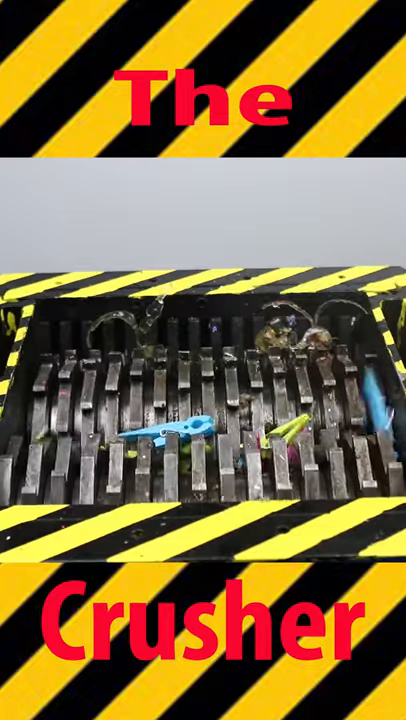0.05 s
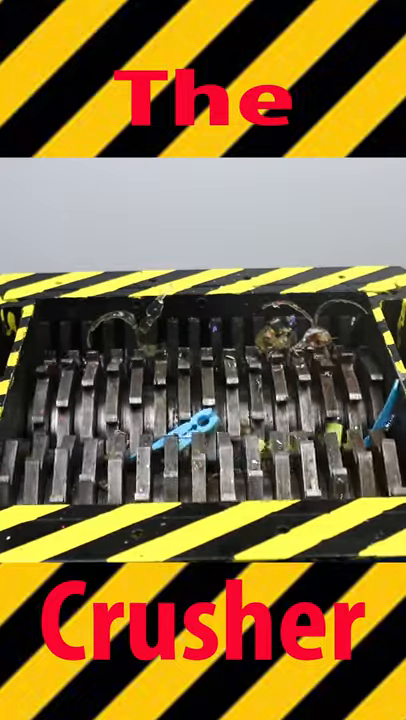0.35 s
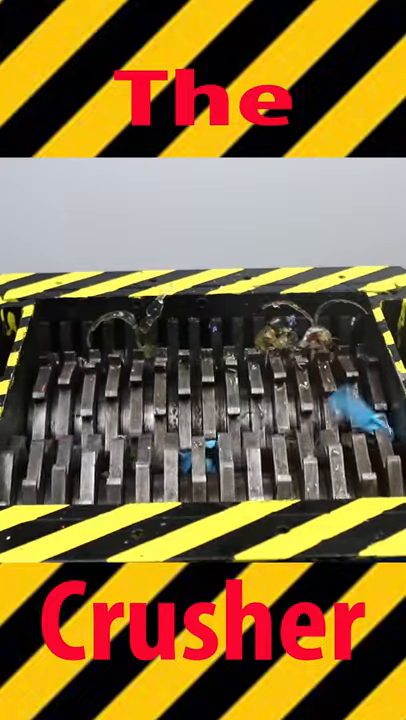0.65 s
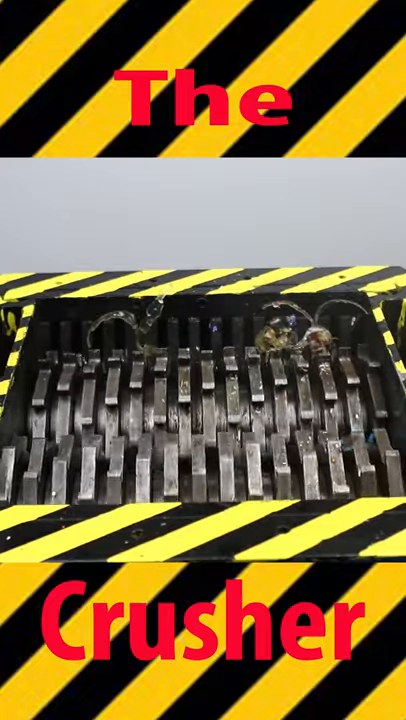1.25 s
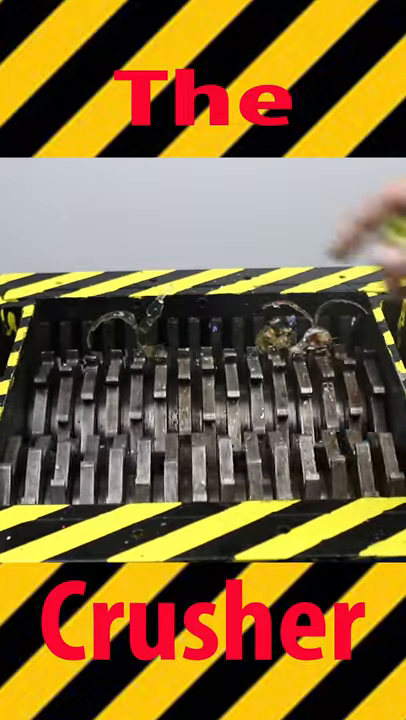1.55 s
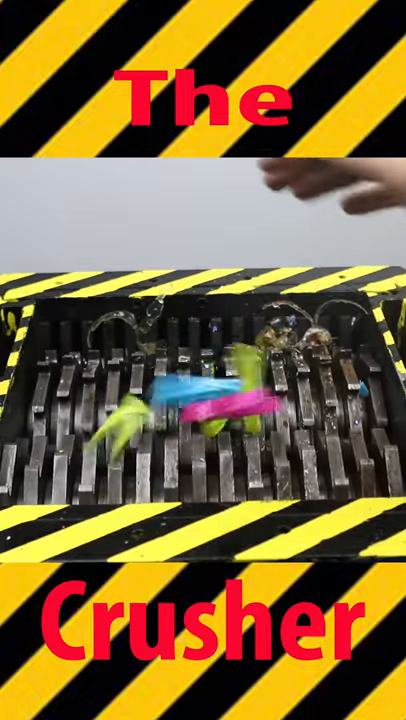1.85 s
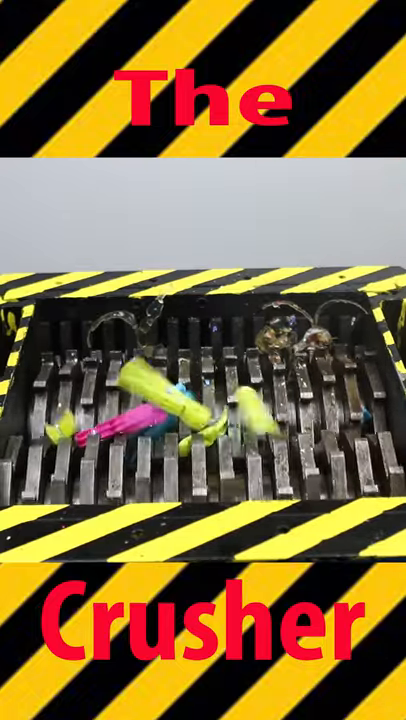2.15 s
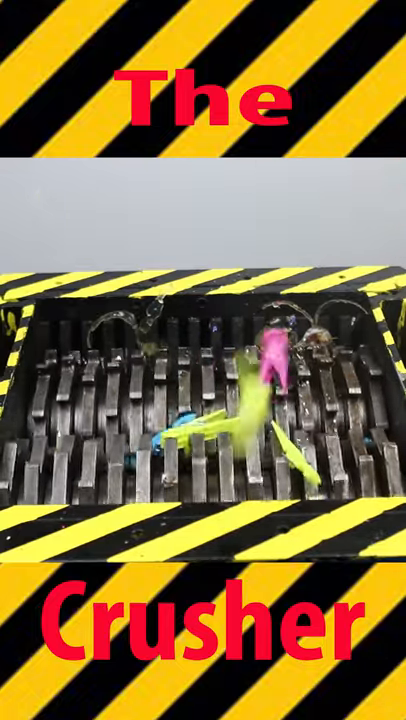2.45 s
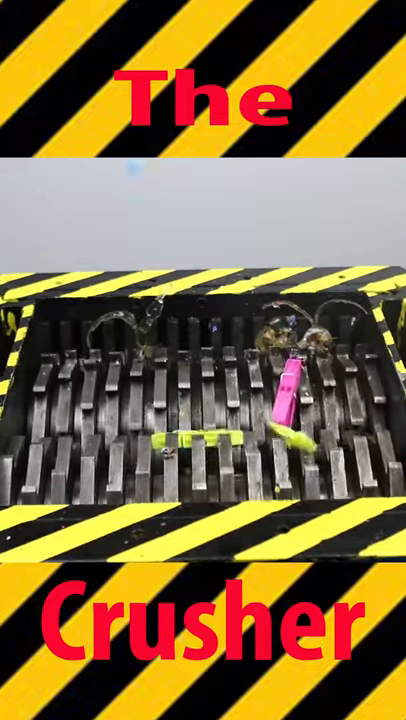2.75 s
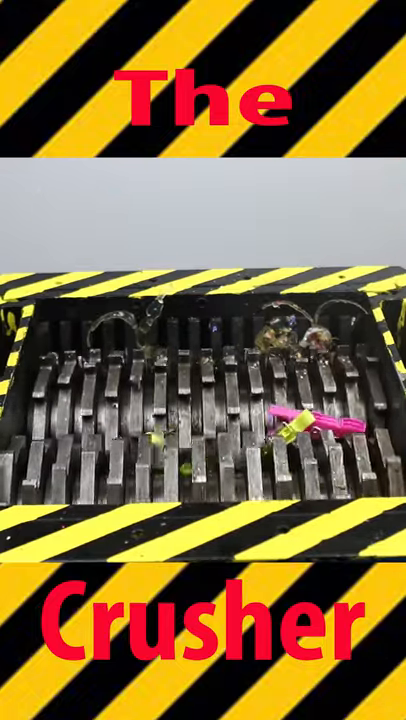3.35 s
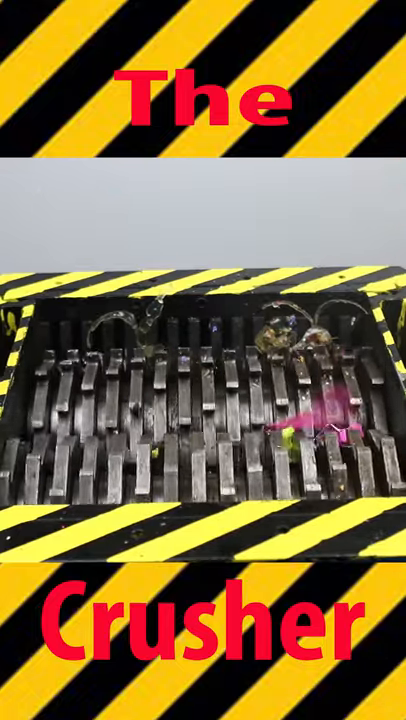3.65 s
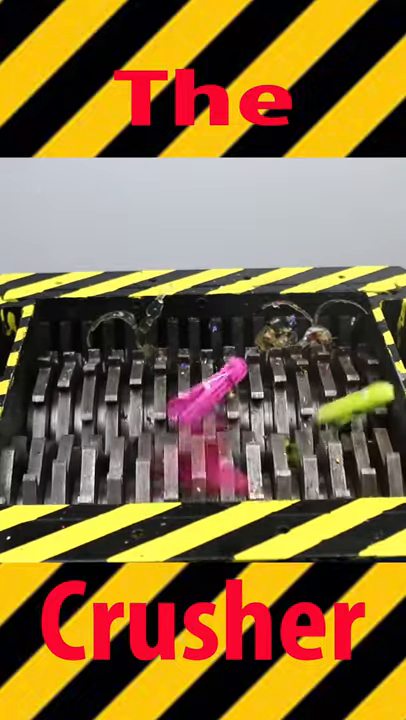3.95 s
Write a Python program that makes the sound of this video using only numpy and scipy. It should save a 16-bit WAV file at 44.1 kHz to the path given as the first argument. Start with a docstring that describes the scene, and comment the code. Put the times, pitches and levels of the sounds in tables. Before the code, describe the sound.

Plastic clothespins crack and snap in a running shredder over a low machine hum.

```python
"""Shredding plastic clothespins

Plastic pegs drop into a slow twin-shaft shredder, heard from close by. The cutters snap them with
bright cracks, crumbs patter about the steel hopper (the feed funnel), and a few pieces knock below.
Underneath, the gearbox hums and throbs with each turn of the motor."""
import sys
import numpy as np
from scipy import signal
from scipy.fft import rfft, irfft
from scipy.io import wavfile
from scipy.ndimage import uniform_filter1d

SR = 44100
rng = np.random.default_rng(int(sys.argv[2]) if len(sys.argv) > 2 else 0)


def waveform_to_disk(signal):
    """Save audio, clipped to [-1, 1], as 16-bit WAV at the path in sys.argv[1]."""
    frames = np.transpose(np.atleast_2d(signal))
    scaled = np.clip(frames, -1, 1) * 32767
    samples = np.round(scaled).astype(np.int16)
    wavfile.write(sys.argv[1], SR, samples)


N = 176400  # 4 seconds
TIME = np.arange(N) / SR
CLICK_TIME = np.arange(1024) / SR  # the seconds within one click
TOP_HZ = 16500  # upper edge of the treble


# pegs breaking (time [s], level [dB], ring pitch [Hz], relative level of the hollow body [dB])
SNAPS = [(0.0363, -21.5, 9900, -35.5), (0.059, -23, 10400, -41.5), (0.0917, -17, 9100, -25),
         (0.1343, -21.5, 9400, -27), (0.1463, -24, 11800, -39), (0.1656, -19, 15000, -36),
         (0.1694, -23, 10300, -32.5), (0.19, -24.5, 9700, -41), (0.2084, -16.5, 7500, -31.5),
         (0.229, -21.5, 9800, -35), (0.2745, -20, 12100, -36.5), (0.2958, -21.5, 9800, -35),
         (0.3114, -19.5, 10400, -37.5), (0.3237, -18.5, 13000, -40), (0.3471, -26, 13400, -42),
         (0.352, -24.5, 10900, -31.5), (0.4053, -20, 13100, -33), (0.4508, -27, 11200, -37.5),
         (0.4972, -10.5, 13000, -31), (0.5023, -14, 9200, -27), (0.5602, -14, 11200, -31.5),
         (0.6385, -18, 10800, -44), (0.685, -22.5, 13200, -36.5), (0.727, -26, 12600, -36),
         (0.764, -27, 14000, -33.5), (0.7675, -22, 12500, -26.5), (0.864, -28.5, 8460, -35.5),
         (0.891, -25.5, 12800, -30.5), (1.067, -26, 13900, -36), (1.1114, -15, 14600, -34.5),
         (1.117, -22, 8900, -37), (1.125, -16.5, 8840, -29), (1.2116, -24, 14600, -38.5),
         (1.2344, -12.5, 14200, -33), (1.2526, -23, 11100, -38.5), (1.2826, -22.5, 13100, -32.5),
         (1.4078, -22, 10900, -37), (1.424, -18, 13200, -26), (1.5109, -24, 14600, -41.5),
         (1.7932, -33.5, 15000, -38), (1.8649, -23, 10600, -32.5), (1.8701, -23.5, 13700, -31),
         (1.903, -28.5, 8300, -57), (1.9159, -23, 8700, -36), (2.171, -19.5, 11100, -40),
         (2.1881, -12, 11500, -23), (2.2555, -13, 9050, -31), (2.2911, -13.5, 10800, -37),
         (2.3102, -20, 12300, -30), (2.3538, -22, 13500, -38), (2.3938, -19, 12000, -24),
         (2.4324, -16, 11200, -31.5), (2.53, -18.5, 9400, -39), (2.5347, -17, 12500, -37.5),
         (2.6063, -21.5, 11500, -38.5), (2.6271, -18, 7400, -34), (2.6633, -23.5, 9700, -35),
         (2.725, -22.5, 9200, -33.5), (2.7612, -25.5, 9000, -31.5), (2.8033, -18, 16000, -39),
         (2.8423, -33.5, 8900, -33.5), (2.8784, -20.5, 12600, -35), (2.9104, -24, 8500, -27.5),
         (2.9225, -22, 12900, -34), (2.9332, -23.5, 13600, -38), (2.952, -18, 11200, -33.5),
         (2.9557, -25, 11400, -35), (2.9679, -22, 9900, -40), (3.0283, -25, 14400, -33.5),
         (3.0547, -25, 13600, -37.5), (3.1583, -21.5, 13600, -33), (3.1831, -23, 12900, -38),
         (3.2508, -20.5, 12200, -34.5), (3.4415, -17, 7770, -24.5), (3.4492, -20, 11500, -26),
         (3.478, -18, 12700, -44), (3.49, -17, 10800, -36.5), (3.592, -25.5, 11900, -34.5),
         (3.6202, -30.5, 12600, -43), (3.656, -23.5, 10500, -45), (3.663, -29, 10700, -33.5),
         (3.7488, -21, 13400, -35), (3.8183, -26.5, 12500, -35.5), (3.881, -20.5, 8860, -31),
         (3.9358, -27.5, 14200, -37)]
# the bright tone of cracking plastic (frequency [Hz], relative level [dB])
SNAP_COLOUR = [(100, -18.5), (1500, -19.5), (4500, -25), (6500, -7), (8600, 0), (10500, -1), (12000, -6.5),
               (14000, 3), (16000, -4)]
# the duller tone of the hollow body (frequency [Hz], relative level [dB])
BODY_COLOUR = [(40, -20), (200, -15.5), (1400, -11), (2900, 4), (4000, -2.5), (5200, 1), (16000, -30)]

def snaps():
    """A faint hiss swells into each crack; the hollow body sounds, and two tiny splinters follow."""
    out, bright, hollow = np.zeros(N), colour(SNAP_COLOUR), colour(BODY_COLOUR)
    for s, db, hz, body_db in SNAPS:
        add(out, s, amp(db) * crack(hz, bright))
        add(out, s, amp(body_db - 2) * puff(hollow, decay_s=.0021))
        lead_in = puff(bright, decay_s=.001)[::-1]  # backwards, so it swells into the crack
        add(out, s - CLICK_TIME[-1], amp(db - 22) * lead_in)
        for delay in np.cumsum(rng.exponential(.0022, size=2)):
            add(out, s + delay, amp(db - 18) * rng.random() * puff(bright, CRACK_S / 2))
    return out


CRACK_S, RING_S = .00065, .0038  # how quickly a crack and its ring die away

def crack(hz, bright):
    """Brittle plastic lets go: a spurt of noise centred on the fragment's pitch, and a short ring."""
    spurt = puff(bright, CRACK_S)
    resonance = signal.iirpeak(min(hz, TOP_HZ), Q=5, fs=SR)
    tuned = burst(signal.lfilter(*resonance, spurt))
    return burst(.5 * spurt + tuned + amp(-17.5) * ring(hz))


def ring(hz):
    """A fragment rings at its own pitch and, more weakly, at four others nearby."""
    nearby_hz = np.minimum(hz * np.exp(.28 * rng.standard_normal(4)), TOP_HZ)
    main = np.sin(2 * np.pi * hz * CLICK_TIME)
    others = np.sin(2 * np.pi * nearby_hz[:, None] * CLICK_TIME).sum(0)
    return burst((main + .5 * others) * np.exp(-CLICK_TIME / RING_S))


# thin splinters flicking off (time [s], level [dB])
CHIPS = [(0.0844, -20.5), (.3074, -24), (.4297, -27), (0.507, -20), (.553, -25), (.5675, -23), (.627, -33),
         (0.8541, -35), (.86, -35), (1.082, -34), (1.2179, -35), (1.3172, -34.5), (1.327, -44),
         (1.626, -39), (1.912, -29), (1.926, -29), (2.0153, -37.5), (2.1071, -39), (2.135, -35),
         (2.426, -20), (2.4524, -35), (2.4731, -23.5), (2.4854, -24.5), (2.5593, -26.5), (2.5737, -33),
         (2.5796, -27), (2.711, -28.5), (2.791, -23), (3.0942, -28), (3.2283, -27.5), (3.3605, -26.5),
         (3.3658, -22), (3.559, -26.5), (3.7562, -23)]

def chips():
    """Splinters too light to sound the hollow body tick, each at a pitch of its own."""
    out, bright = np.zeros(N), colour(SNAP_COLOUR)
    for s, db in CHIPS:
        hz = 11220 * np.exp(.14 * rng.standard_normal())
        add(out, s, amp(db) * crack(hz, bright))
    return out


# whole pegs being struck (time [s], level [dB], pitch [Hz], fade time [s])
PINGS = [(.768, -42, 1010, .004), (1.9036, -33, 4940, .002), (1.9164, -27, 5130, .003),
         (2.188, -25, 5580, .0015), (3.442, -27.5, 4830, .02), (3.49, -27, 5100, .002)]

def pings():
    """The leg or spring of a struck peg rings, lower than a snapped-off fragment."""
    out, t = np.zeros(N), np.arange(SR // 10) / SR
    for s, db, hz, decay_s in PINGS:
        tone = np.sin(2 * np.pi * hz * t) * np.exp(-t / decay_s)
        add(out, s, amp(db) * burst(tone))
    return out


# quick runs of small cracks (time [s], fade time [s], level [dB])
CRUNCHES = [(0.089, 0.0068, -19), (.142, 0.0046, -20.5), (0.342, 0.022, -30), (0.497, 0.0098, -24),
            (1.863, 0.016, -33), (2.182, 0.014, -24), (2.309, 0.0092, -24), (2.432, 0.009, -21),
            (2.668, 0.0076, -30)]

def crunches():
    """A peg splinters or tumbles in a dense run of tiny cracks that fades fast."""
    loudness = np.zeros(N)
    for s, fade_s, db in CRUNCHES:
        t = np.arange(0, 2 * fade_s, 1 / SR)
        add(loudness, s, amp(db) * np.exp(-(t / fade_s) ** 2))
    return loudness * patter(SNAP_COLOUR, per_s=650, spread_db=3.5)


# how loudly the crumbs rattle (time [s], level [dB])
CRUMB_LEVEL = [(0, -47), (.15, -45), (.72, -47.5), (.95, -61), (1.28, -47.5), (1.55, -57), (1.82, -61),
               (2.3, -43), (2.85, -50), (2.96, -45), (3.29, -50.5), (3.5, -35.5), (3.7, -66), (3.82, -53)]
# the tone of the crumbs (frequency [Hz], relative level [dB])
CRUMB_COLOUR = [(100, -18), (1000, -18), (3000, -0.5), (4200, -6.5), (9000, -3), (16000, -4.5)]

def crumbs():
    """Loose crumbs rattle on the cutters, some much louder than others."""
    return level(CRUMB_LEVEL) * patter(CRUMB_COLOUR, per_s=420, spread_db=7)


# how loudly the bouncing pegs clatter (time [s], level [dB])
CLATTER_LEVEL = [(1.84, -52), (1.89, -36.5), (1.98, -49.5), (2.05, -43.5), (2.19, -41), (2.26, -84)]
# the tone of the bouncing pegs (frequency [Hz], relative level [dB])
CLATTER_COLOUR = [(100, -18.5), (2200, -1), (4000, -2), (5200, -2), (8000, -2), (15000, -6.5)]

def clatter():
    """A handful of whole pegs bounces briefly on the cutters."""
    started = TIME > CLATTER_LEVEL[0][0]
    return level(CLATTER_LEVEL) * started * patter(CLATTER_COLOUR, per_s=420, spread_db=4.5)


def patter(tone_colour, per_s, spread_db):
    """Many bits of plastic tick at random moments, each ringing at one of 16 pitches."""
    times = np.flatnonzero(rng.random(N) < per_s / SR) / SR
    ticks = [puff([1], CRACK_S / 2) + amp(-2.5) * ring(hz) for hz in np.geomspace(2400, 15000, 16)]
    kinds = rng.integers(0, len(ticks), len(times))
    strengths = np.minimum(rng.exponential(1, len(times)), 3.5)  # mostly weak, a few strong
    out = np.zeros(N)
    for s, kind, strength in zip(times, kinds, strengths):
        add(out, s, ticks[kind] * amp(spread_db * strength))
    return unit(signal.oaconvolve(out, colour(tone_colour))[:N])


# pieces dropping under the cutters (time [s], level [dB])
KNOCKS = [(.134, -35.5), (1.4233, -35), (1.476, -29.5), (1.533, -37.5), (2.929, -40), (2.964, -36),
          (3.172, -37.5), (3.526, -36.5)]
# the notes the bin rings with (pitch [Hz], relative level [dB])
BIN_NOTES = [(1200, -12.5), (1712, -14.5), (2200, -0.5), (2584, 1.5), (2900, -11), (3500, -4)]

def knocks():
    """Falling pieces hit the bin with a dull, rattling clack."""
    out, t = np.zeros(N), np.arange(0, .08, 1 / SR)
    fade_db = -60 * t / .02  # 60 dB quieter after 20 ms
    for s, db in KNOCKS:
        bin_ring = np.zeros(len(t))
        for hz, note_db in BIN_NOTES:
            cycles = hz * rng.uniform(1, 1.03) * t + rng.random()
            bin_ring += amp(note_db + fade_db) * np.sin(2 * np.pi * cycles)
        add(out, s, amp(db) * puff(bin_ring, decay_s=.003))
    return out


# jolts of the cutters (time [s], relative level [dB])
JOLTS = [(.324, -45.5), (0.501, -57), (1.234, -56), (1.425, -47.5), (2.191, -59), (2.257, -62),
         (2.29, -46.5), (2.803, -50), (3.158, -45), (3.49, -49)]
# the low tone of a jolt (frequency [Hz], relative level [dB])
JOLT_COLOUR = [(25, 6), (70, -1), (300, 2), (700, -6), (1500, -3), (8000, -101)]

def jolts():
    """The cutters jump with a short, low thump as a peg gives way."""
    out, thump = np.zeros(N), colour(JOLT_COLOUR)
    for s, db in JOLTS:
        rough_thump = burst(thump) + .5 * puff(thump, decay_s=.0013)
        add(out, s, amp(db + 6) * burst(rough_thump))
    return out


# hard bites that shake the frame (time [s], relative level [dB])
RUMBLES = [(0.779, -63), (1.2, -60), (1.43, -58)]
# the deep tone of the frame (frequency [Hz], relative level [dB])
FRAME_COLOUR = [(25, -25), (65, 0), (200, -10), (4000, -37)]

def rumbles():
    """The frame rumbles for a moment after a hard bite."""
    out, t = np.zeros(N), np.arange(SR // 2) / SR
    frame, fade = colour(FRAME_COLOUR, size=4096), np.exp(-(t / .12) ** 2)
    for s, db in RUMBLES:
        shaking = signal.fftconvolve(rng.standard_normal(len(t)), frame)[:len(t)]
        add(out, s, amp(db + 1) * unit(shaking) * fade)
    return out


# gear tones from low to high, MOTOR_HZ apart; the fourth is at TOOTH_HZ (relative level [dB])
GEAR_TONES = [-14, -12, -1, 0, -5, -4.5, -18, -5.5, -11, -8.5, -13]
# how loudly the gears hum (time [s], level [dB])
GEAR_LEVEL = [(0, -59), (1.05, -55.5), (1.46, -55.5), (2.1, -49.5), (2.3, -56.5), (4, -61.5)]
TOOTH_HZ, MOTOR_HZ = 614.9, 22.18  # teeth meeting per second, motor turns per second

def gearbox():
    """Meeting gear teeth hum; the closely spaced tones beat together, one throb per motor turn."""
    waver = np.cumsum(.46 * wander(size=4000)) / SR  # the pitch strays by about half a hertz
    t = TIME - 1.784  # the tones nearly line up in a throb at this moment
    hum = np.zeros(N)
    for k, db in enumerate(GEAR_TONES, -3):
        cycles = (TOOTH_HZ + k * MOTOR_HZ) * t + waver
        smear = .14 * k * k + .26 * k * wander(size=1500)  # spreads each throb and makes it uneven
        roughness = 1 + .18 * wander(size=1500)
        hum += amp(db) * roughness * np.cos(2 * np.pi * cycles + smear)
    return level(GEAR_LEVEL) * unit(hum)


# the tone of the running machine (frequency [Hz], relative level [dB])
RUNNING_COLOUR = [(25, -28), (60, 7.5), (78, 1), (130, -2), (600, 7.5), (1500, 2.5), (3200, 2.5),
                  (4500, -6.5), (16000, -37)]

def running_noise():
    """The running machine makes a soft, steady rush."""
    hz = np.fft.rfftfreq(N, 1 / SR)
    spectrum = rfft(rng.standard_normal(N)) * amp(look_up(RUNNING_COLOUR, hz))
    return amp(-59.5) * unit(irfft(spectrum, N))


# narrow bands of hiss from the motor drive (pitch [Hz], half-width [Hz], relative level [dB])
DRIVE_WHINE = [(5980, 150, -64.5), (6610, 130, -67), (11950, 170, -66), (12540, 260, -68)]

def drive_whine():
    """The motor drive whines thinly, swelling a little when the gears get louder."""
    hz = np.fft.rfftfreq(N, 1 / SR)
    noise, whine = rfft(rng.standard_normal(N)), np.zeros(N)
    for pitch, width, db in DRIVE_WHINE:
        band = noise / (1 + ((hz - pitch) / width) ** 2)
        whine += amp(db) * unit(irfft(band, N))
    return whine * unit(level(GEAR_LEVEL)) ** .25


# how long sound lingers in the hopper (frequency [Hz], time to fade by 60 dB [s])
HOPPER_FADE = [(100, 0.23), (3000, 0.16), (16000, 0.098)]

def hopper(x):
    """The steel walls add quick echoes, then a short tail whose treble dies first."""
    t = np.arange(SR // 2) / SR
    echoes = rng.standard_normal(len(t)) * (t > .002)
    hz, when, spectrum = signal.stft(echoes, SR, nperseg=256)
    fade = amp(-60 * when / look_up(HOPPER_FADE, hz)[:, None])
    tail = signal.istft(spectrum * fade, SR, nperseg=256)[1][:len(t)]
    early = echoes * (rng.random(len(t)) < .08) * np.exp(-t / .0047)
    response = amp(-18) * tail / np.linalg.norm(tail) + amp(-12.5) * early / np.linalg.norm(early)
    return x + signal.oaconvolve(x, response)[:N]


def puff(body, decay_s):
    """A dying spurt of noise takes on the tone of the body it passes through."""
    rise = 1 - np.exp(-CLICK_TIME * 3.6 / decay_s)
    noise = rng.standard_normal(len(CLICK_TIME)) * rise * np.exp(-CLICK_TIME / decay_s)
    return burst(signal.fftconvolve(noise, body)[:len(CLICK_TIME)])


def colour(points, size=1024):
    """The sound of one sharp tap on a body with the given tone (its impulse response)."""
    hz = abs(np.fft.fftfreq(size, 1 / SR))
    log_gain = np.log(amp(look_up(points, hz)))
    return np.fft.ifft(np.exp(np.conj(signal.hilbert(log_gain)))).real


def look_up(points, hz):
    """Reads between the rows of a frequency table, giving every octave equal room."""
    row_hz, value = np.transpose(points)
    return np.interp(np.log(hz + 1), np.log(row_hz + 1), value)


def level(points):
    """Joins (time [s], level [dB]) points into a volume curve."""
    return amp(np.interp(TIME, *np.transpose(points)))


def wander(size):
    """Slow random drift, smoothed over `size` samples."""
    return unit(uniform_filter1d(uniform_filter1d(rng.standard_normal(N), size), size))


def amp(db):
    """Turns decibels into a volume multiplier."""
    return 10 ** (np.asarray(db) / 20)


def unit(x):
    """Scales a sound to an average strength (rms) of 1."""
    return x / np.sqrt(np.mean(x ** 2) + 1e-20)


def burst(x):
    """Gives a click the energy of 4 ms of sound at strength 1."""
    return x * np.sqrt(.004 * SR / (np.sum(x ** 2) + 1e-20))


def add(mix, s, sound):
    """Mixes a sound in, starting at s seconds."""
    part = mix[max(round(s * SR), 0):][:len(sound)]
    part += sound[:len(part)]


def scene():
    """Breaking plastic echoes in the hopper over the running machine, in one channel."""
    rattling = crumbs() + clatter()
    breaking = snaps() + chips() + pings() + crunches()
    bumping = jolts() + rumbles() + knocks()
    shredding = hopper(breaking + rattling + bumping)
    return (shredding + gearbox() + running_noise() + drive_whine())[None]


def record(dry):
    """Cuts off the treble above TOP_HZ."""
    low_pass = signal.firwin(255, TOP_HZ, window=("kaiser", 8), fs=SR)
    return signal.oaconvolve(dry, low_pass[None], "same")


dry = scene()
out = record(dry)
waveform_to_disk(out)
```